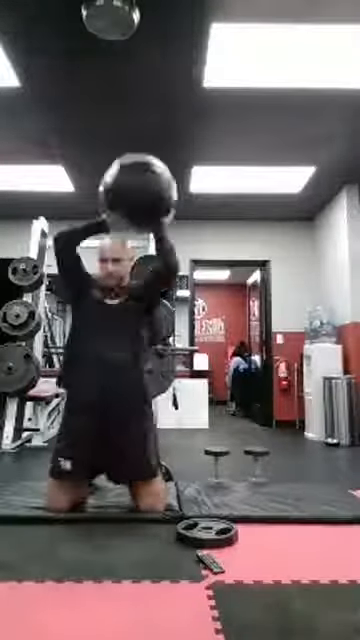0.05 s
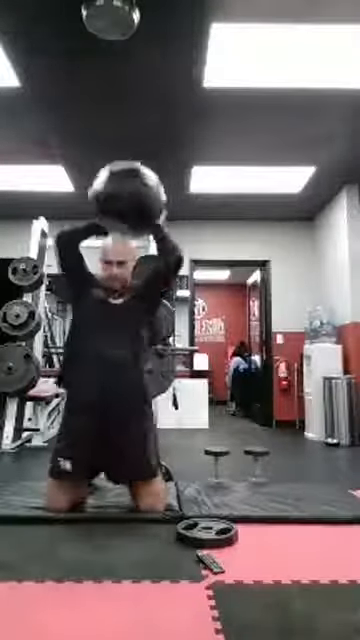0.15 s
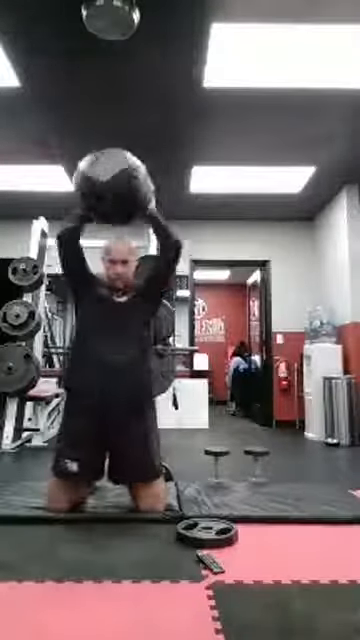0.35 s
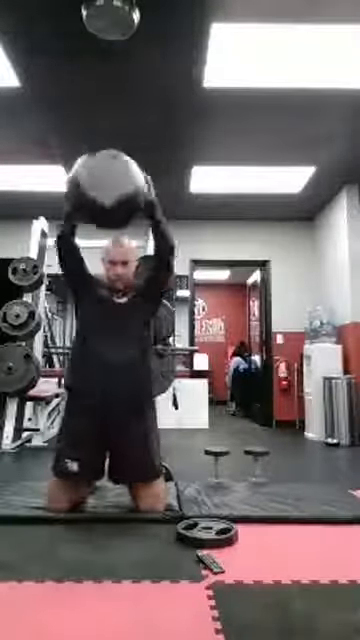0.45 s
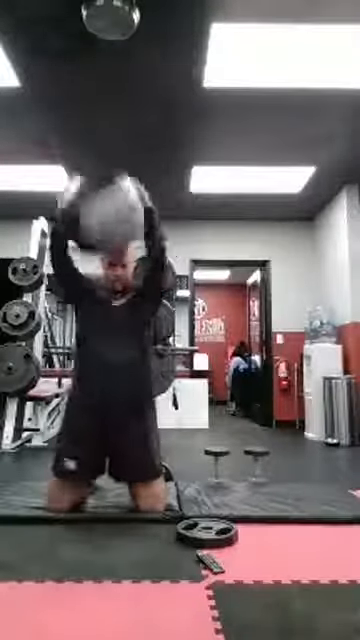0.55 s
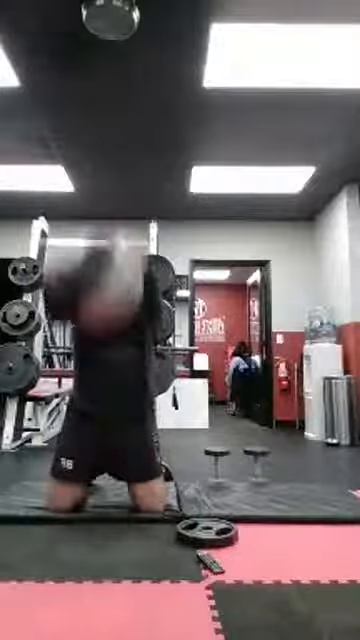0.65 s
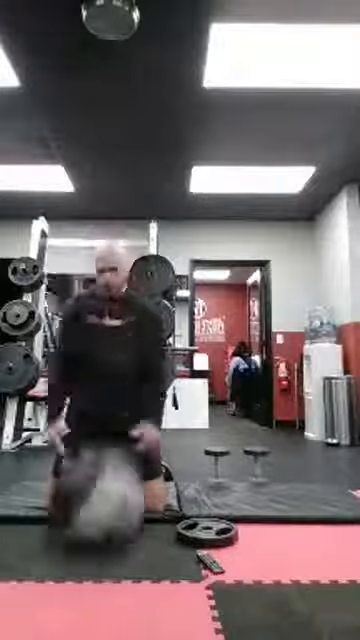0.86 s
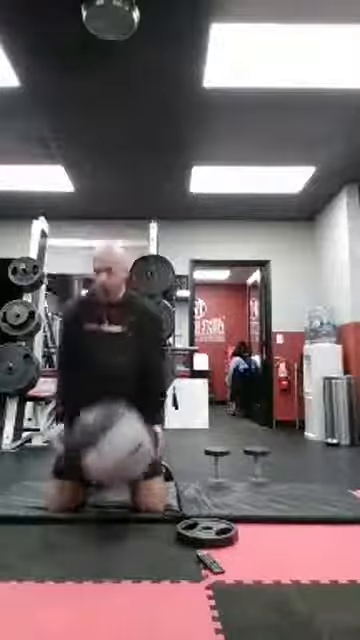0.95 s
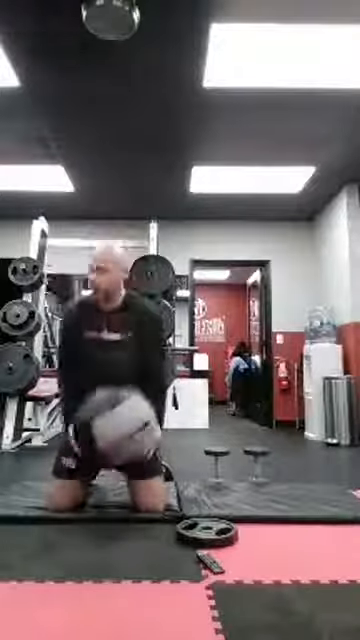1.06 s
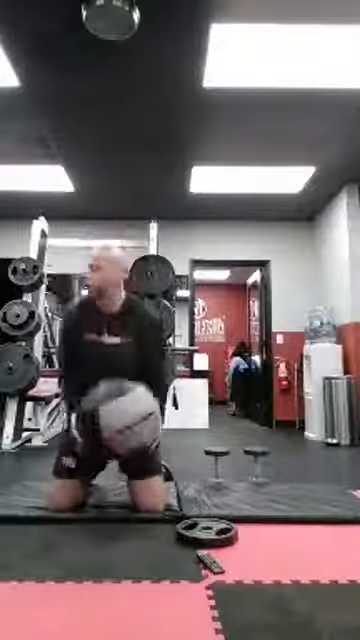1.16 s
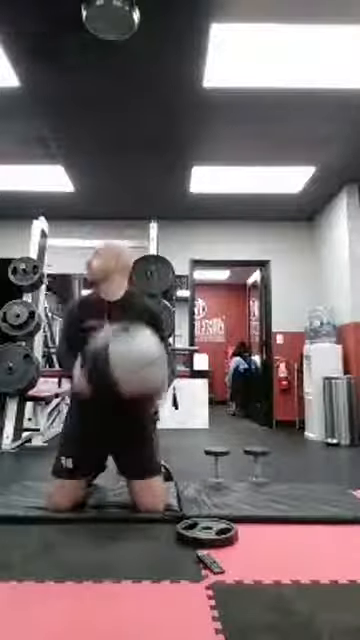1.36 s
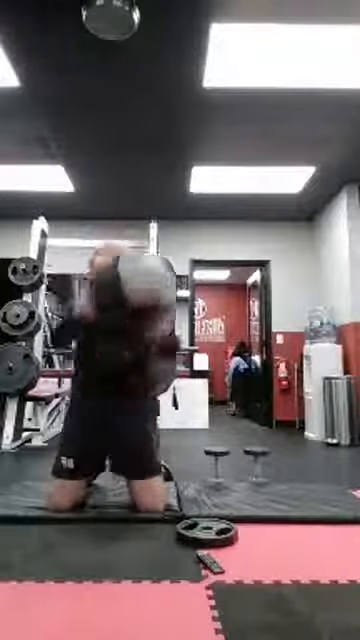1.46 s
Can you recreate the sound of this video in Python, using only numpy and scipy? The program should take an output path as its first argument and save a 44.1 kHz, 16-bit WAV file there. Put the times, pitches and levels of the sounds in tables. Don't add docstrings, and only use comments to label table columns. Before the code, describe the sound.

A heavy sand-filled ball slams a rubber gym mat, deep booming thuds with slapping knocks

```python
import sys
import numpy as np
from scipy import signal
from scipy.fft import rfft, irfft
from scipy.io import wavfile
from scipy.ndimage import uniform_filter1d

SR = 44100
rng = np.random.default_rng(int(sys.argv[2]) if len(sys.argv) > 2 else 0)


def master_out(mix):
    frames = np.transpose(np.atleast_2d(mix))
    ceiling = np.clip(frames, -1, 1)
    pcm = np.round(ceiling * 32767).astype(np.int16)
    wavfile.write(sys.argv[1], SR, pcm)


def ratio_of_db(decibels):
    return 10 ** (np.asarray(decibels, float) / 20)


N = 66150

BLOW_S = [
    .2012,
    .4157,
    .5728,
    .6445,
    .9092,
]


def evened(x):
    return x / np.sqrt(np.mean(x ** 2) + 1e-20)


def read(points, hz):
    f, value = np.transpose(points)
    return np.interp(np.log(hz + 1), np.log(f + 1), value)


def coloured(x, points, tilt_db=0):
    hz = np.fft.rfftfreq(len(x), 1 / SR)
    level_db = read(points, hz) + tilt_db * np.log2((hz + 1) / 4000)
    low_cut = 1 + (points[0][0] / (hz + 1)) ** 4
    return evened(irfft(rfft(x) * ratio_of_db(level_db) / low_cut, len(x)))


def grains(count, per_s, spread_db):
    u = rng.random((count, 3))
    struck = u[:, 0] < per_s / SR
    size = ratio_of_db(-spread_db * np.log(u[:, 2] + 0.0016))
    return struck * np.sign(u[:, 1] - .5) * size


def ventilation():
    # frequency in Hz, density in dB per Hz.
    air = [(25, 7), (60, -0.5), (130, -15), (300, -17), (700, -18), (1500, -30.5), (3500, -40), (7000, -31),
           (14300, -40)]
    return ratio_of_db(-51.5) * coloured(rng.standard_normal(N), air)


def earlier_blow():
    # frequency in Hz, density in dB per Hz.
    before = [(15, -20), (25, 6), (161, -30), (215, -10), (320, -15.5), (833, -19.5), (3150, -30.5),
              (7560, -24.5), (14300, -43)]
    t = np.arange(N) / SR
    return ratio_of_db(-47 - 60 * t / 3) * coloured(rng.standard_normal(N), before)


def hum():
    # frequency in Hz, level in dB, t60 in seconds.
    partials = [
        (112, -49, 4.7),
        (205.5, -46, 0.47),
        (207.6, -58.5, 5.9),
    ]
    t = np.arange(N) / SR
    return sum(ratio_of_db(db - 60 * t / t60) * np.sin(2 * np.pi * hz * t) for hz, db, t60 in partials)


def high_tone():
    # time in seconds, level in dB.
    envelope = [
        (.578, -47),
        (.62, -53),
        (.645, -58),
        (.66, -55),
        (.72, -57),
        (.76, -66),
        (.893, -73),
    ]
    t = np.arange(N) / SR
    level_db = np.interp(t, *np.transpose(envelope), left=-120, right=-120)
    level = uniform_filter1d(ratio_of_db(level_db), size=150)
    return 2 * level * np.sin(2 * np.pi * 13313 * t)


def room(x):
    # frequency in Hz, t60 in seconds.
    decay = [(40, 0.27), (110, 0.67), (280, 0.66), (740, 0.3), (1940, 0.41), (5120, 0.48), (13500, 0.31)]
    far_t60_s, far_db = 1.51, -22
    blur_octaves, gap_s = .45, 0.0092
    hz, t, z = signal.stft(rng.standard_normal(SR), SR, nperseg=1024)

    power = abs(rfft(x[:4096], 4096)[::4]) ** 2 + 1e-12
    octaves = np.log2((hz[:, None] + 20) / (hz + 20))
    near = np.exp(-(octaves / blur_octaves) ** 2)
    colour = np.sqrt(near @ power / near.sum(1))[:, None]

    fall = ratio_of_db(-60 * t / read(decay, hz)[:, None]) + ratio_of_db(far_db - 60 * t / far_t60_s)
    fall /= np.sqrt((fall ** 2).sum(1, keepdims=True) * 512)
    tail = signal.istft(z * colour * fall, SR, nperseg=1024)[1][:SR]

    arrived = np.cumsum(x ** 2) / np.sum(x ** 2)
    build = np.interp(np.arange(SR) - gap_s * SR, np.arange(len(x)), arrived, left=0)
    return tail * np.sqrt(uniform_filter1d(build, size=200).clip(0))


def add(mix, s, sound):
    part = mix[round(s * SR):][:len(sound)]
    part += sound[:len(part)]


def add_in_room(mix, s, sound, wet_db):
    add(mix, s, sound)
    add(mix, s, ratio_of_db(wet_db) * room(sound))


def slap(level_db, rise, length, tilt_db):
    # frequency in Hz, density in dB per Hz.
    sand_spectrum = [(410, -9), (700, -10), (1220, -14), (1350, -13.5), (1970, -13.5), (2770, -14.5),
                     (7230, -9.5), (12900, -21.5), (14300, -28.5)]
    t = np.arange(SR // 8) / SR
    sand = coloured(grains(len(t), 16000, 1.5), sand_spectrum, tilt_db)
    return ratio_of_db(level_db) * np.clip(t / rise, 0, 1) * np.exp(-(t / length) ** 2) * sand


def knock(level_db, contact, per_s, rings):
    contact_s, ring_rise_s = .0003, .003
    rattle_from_hz = 233
    t = np.arange(SR // 4) / SR
    rattle = 0.7 * grains(len(t), per_s, 1.0) * np.exp(-(t / contact) ** 2)

    hz, width, db = np.transpose(rings)[:, :, None]
    decay = np.exp(-np.pi * width * t)
    rise = 1 - 0.61 * np.exp(-t / ring_rise_s)
    modes = ratio_of_db(db) * width * decay * np.sin(2 * np.pi * hz * t) * rise
    upper = (modes / (1 + (rattle_from_hz / hz) ** 2)).sum(0)
    rung = modes.sum(0) + signal.fftconvolve(rattle, upper)[:len(t)]

    soft = t[:200] * np.exp(-t[:200] / (contact_s / 4))
    out = np.convolve(rung, soft)[:len(t)]
    return ratio_of_db(level_db) * out / np.sqrt(np.mean(out[:SR // 40] ** 2))


def boom(level_db, hz, t60):
    rise_s, push_turns, push_s = 0.0076, 0.23, 0.0014
    t = np.arange(SR // 2) / SR
    turns = hz * t + push_turns * (1 - np.exp(-t / push_s))
    return ratio_of_db(level_db - 60 * t / t60) * (1 - np.exp(-t / rise_s)) * np.sin(2 * np.pi * turns)


def add_slaps(mix):
    slap_s = [.2008, .229, .4156, .5765, .585, .599, .648, .659, .7195, .9095, .917, 1.205, 1.475]
    # level in dB, rise in seconds, length in seconds, tilt in dB per octave.
    slaps = [(-23.5, 0.00039, 0.043, -2), (-49, 0.0034, 0.026, -35), (-15, 0.0015, 0.054, -4),
             (-17, 0.00077, 0.008, 0.5), (-29, 0.0013, .008, -1), (-22, 0.0017, 0.019, -1.3),
             (-17.5, 0.0027, 0.006, -2), (-23, 0.00067, 0.046, -2), (-27.5, 0.0013, .01, -5.5),
             (-22.5, 0.0014, 0.018, -3.5), (-20, 0.0035, 0.025, 0.06), (-47, 0.0057, .02, -6),
             (-56.5, 0.0039, .03, -3.5)]
    for s, row in zip(slap_s, slaps):
        add_in_room(mix, s, slap(*row), 3.5)


def add_knocks(mix):
    # level in dB, length of contact in seconds, contacts per second, room level in dB.
    knocks = [
        (-8.5, 0.013, 250, -5.5),
        (-10, .024, 1500, -7),
        (-23, 0.058, 340, 2),
        (-20, 0.031, 420, 2.5),
        (-19.5, 0.023, 230, 0),
    ]
    # frequency in Hz, width in Hz, level in dB.
    ring_1 = [(111, 110, 0), (207, 33, 1), (352.7, 15, -10), (618, 82, -2.5), (675, 36, -2.5),
              (753, 90, -8.5), (1300, 1500, -11.5), (2200, 1300, -25)]
    ring_2 = [(118, 31, -2), (217, 33, 4.5), (304, 60, -4), (428, 115, 1.5), (695, 120, -4.5),
              (945, 140, 2), (1510, 490, -3), (2100, 200, -5.5), (2840, 800, -6.5)]
    ring_3 = [(101, 54, -18), (172, 137, 0.5), (352, 180, -3), (610, 120, -15), (1330, 260, -32)]
    ring_4 = [(110, 170, -13), (191, 210, 3.5), (354, 76, -6.5), (440, 75, -6.5), (523, 110, -1),
              (810, 200, -14), (1450, 1200, -10)]
    ring_5 = [(182.4, 54, 9.5), (347, 24, 0), (462, 31, -0.5), (700, 120, -6), (1220, 350, -18)]
    rings = ring_1, ring_2, ring_3, ring_4, ring_5
    for s, (*row, wet_db), ring in zip(BLOW_S, knocks, rings):
        add_in_room(mix, s, knock(*row, ring), wet_db)


def add_booms(mix):
    # level in dB, frequency in Hz, t60 in seconds.
    booms = [
        (-7.5, 40, 0.18),
        (-2, 43, 0.13),
        (-11, 36, 0.25),
        (-10, 33.3, 0.26),
        (-19, 47.5, 0.35),
    ]
    for s, row in zip(BLOW_S, booms):
        add_in_room(mix, s, boom(*row), -7)


def scene():
    mix = ventilation() + earlier_blow() + hum() + high_tone()
    add_slaps(mix)
    add_knocks(mix)
    add_booms(mix)
    return mix[None]


def top_cut(x):
    return signal.sosfilt(signal.butter(12, 15080, fs=SR, output="sos"), x)


def record(dry):
    ceiling, edge_hz = .76, 14260
    held = dry / (1 + abs(dry / ceiling) ** 6) ** (1 / 6)
    edge = signal.firwin(1023, edge_hz, window=("kaiser", 9), fs=SR)[None]
    mix = signal.oaconvolve(held, edge, "same")
    return top_cut(mix)


dry = scene()
out = record(dry)
master_out(out)
```